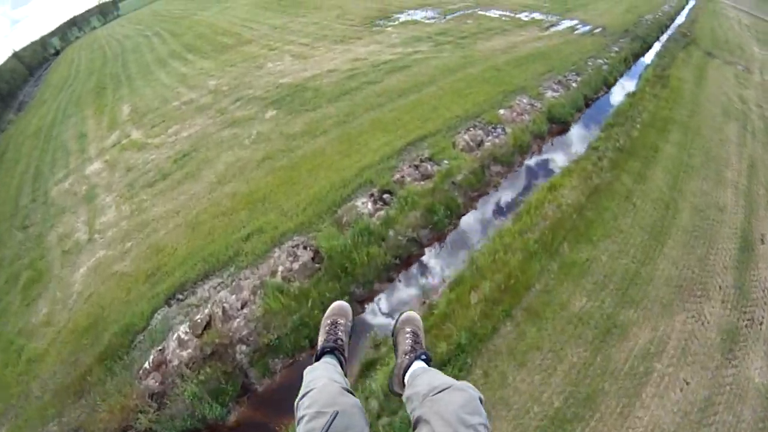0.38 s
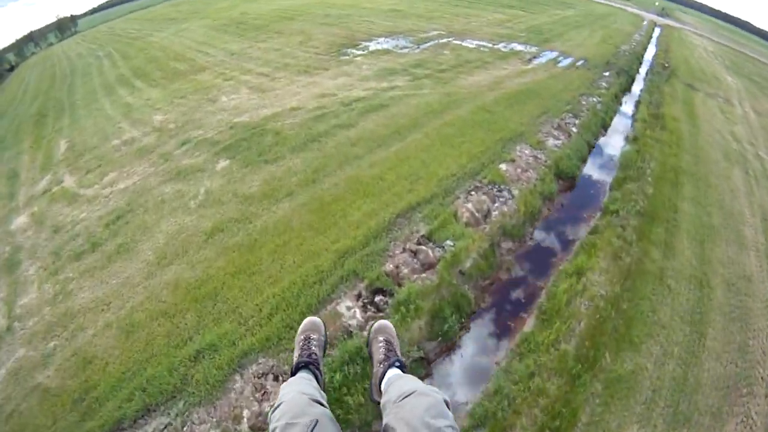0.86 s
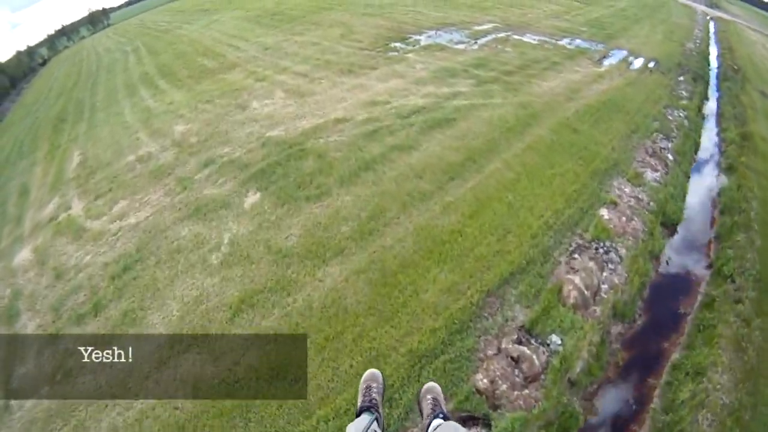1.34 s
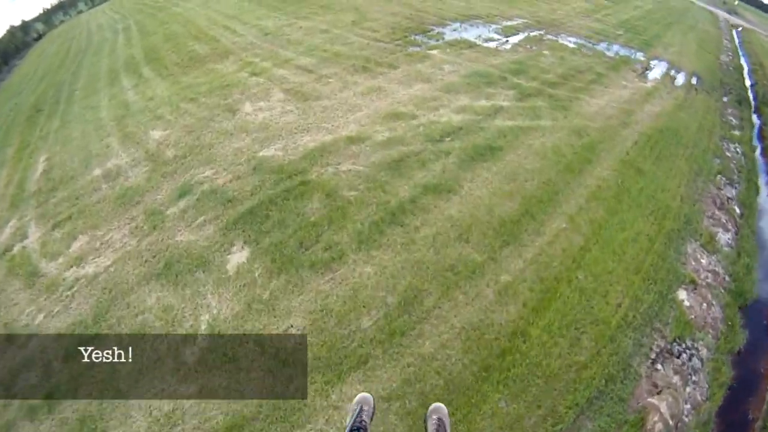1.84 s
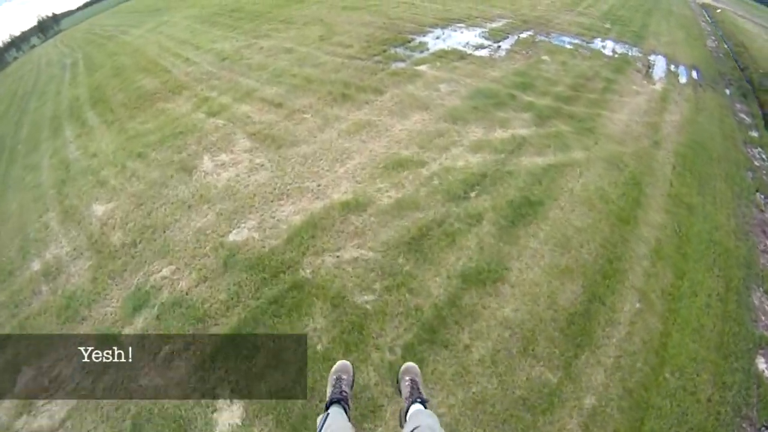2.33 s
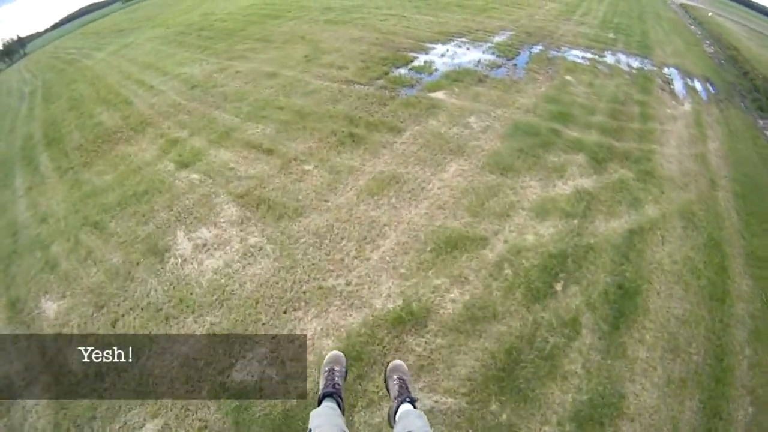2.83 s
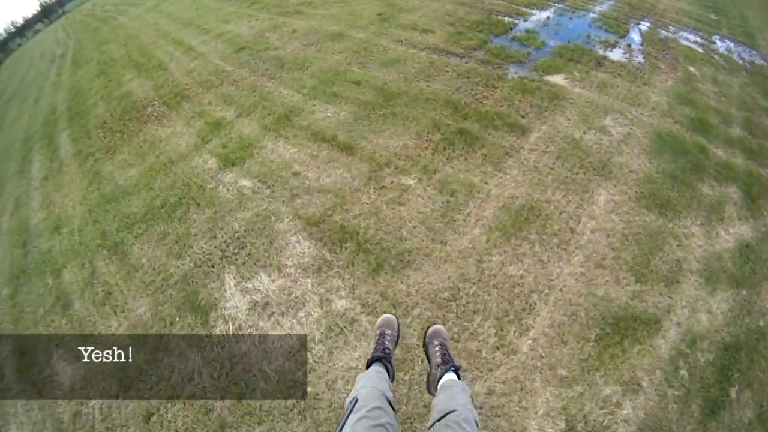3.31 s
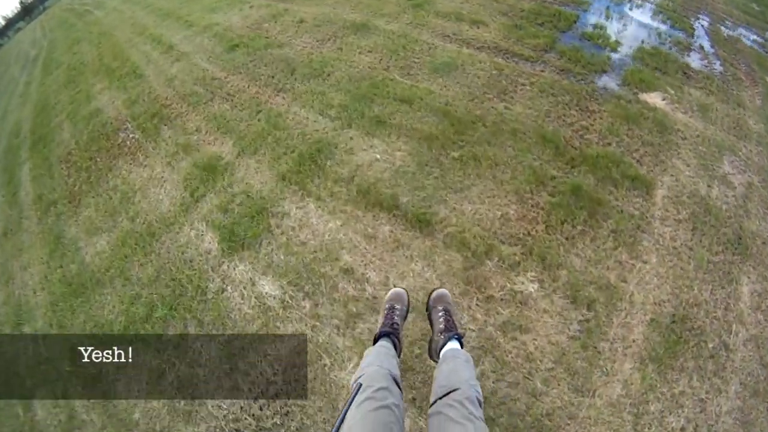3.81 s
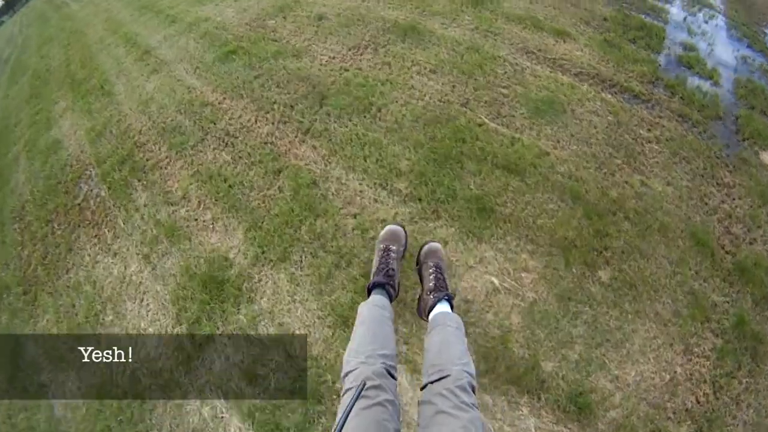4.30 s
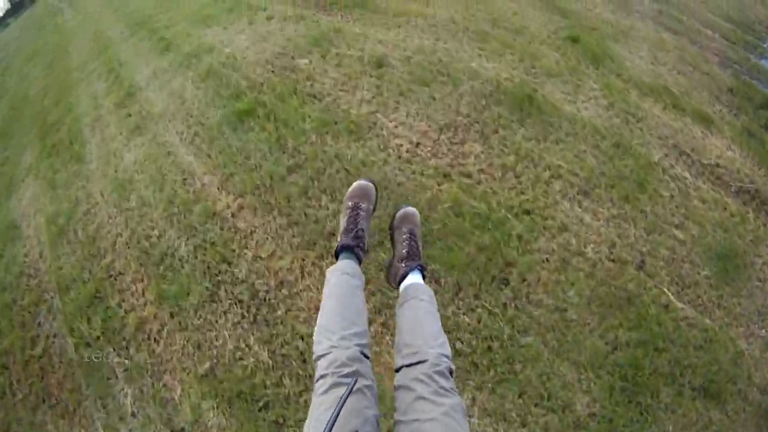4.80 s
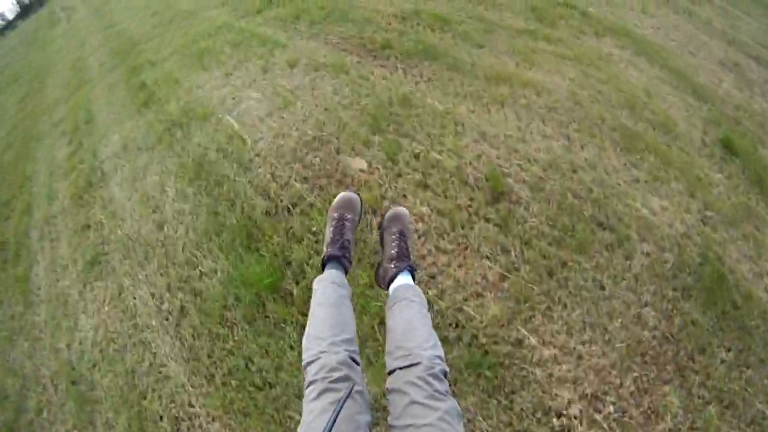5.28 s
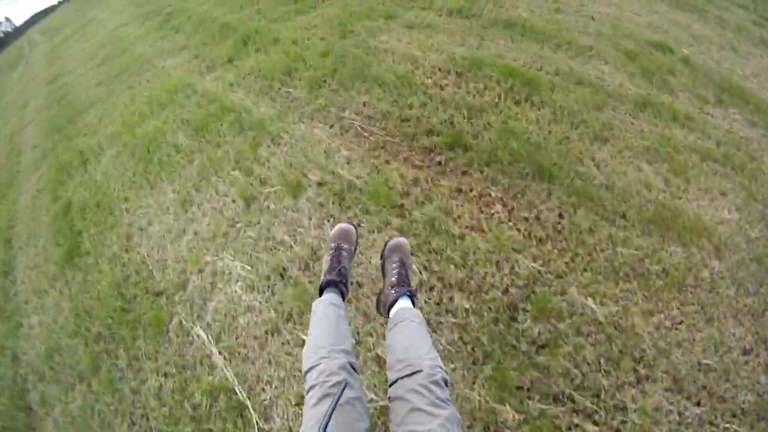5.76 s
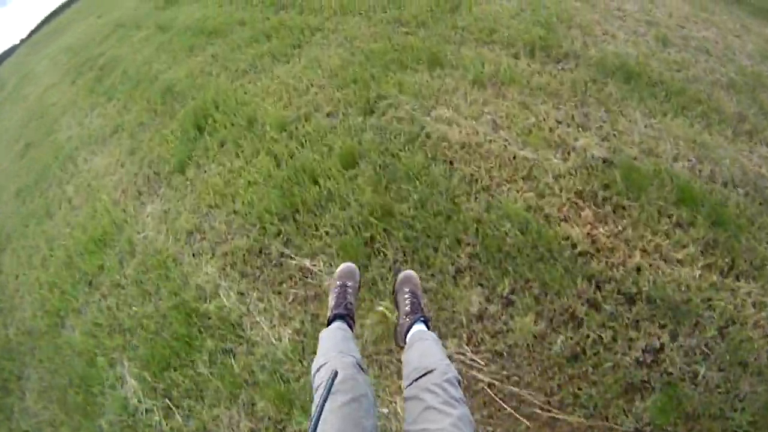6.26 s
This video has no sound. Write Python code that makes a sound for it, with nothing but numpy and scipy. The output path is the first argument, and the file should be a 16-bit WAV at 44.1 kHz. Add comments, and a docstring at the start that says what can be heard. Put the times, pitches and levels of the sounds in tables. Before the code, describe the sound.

Wind rushes straight onto a small microphone flying low over an open meadow. A deep, nearly constant rumble throbs under a muffled roar, while gusts bring rasp and hiss. Cloth flutters faintly. In the last second or so the wind drops as the flight slows, and quiet strap squeaks and soft fabric swishes show through. Coarse, low-quality sound with a thin sizzle on top.

```python
"""Wind on a low-flying camera

A small camera flies low over a meadow under a fabric wing, slowing down; wind tears across its microphone port.
Shaped noises form the wind: large eddies buffet the capsule, smaller ones roar in the housing and hiss at
the port's edge. Cloth rustles and swishes as flickering noise, and a strap squeaks in short gliding tones.
The recorder samples slowly and holds each value, which mirrors the roar as a thin sizzle high up."""
import sys
import numpy as np
from scipy import signal
from scipy.fft import rfft, irfft, next_fast_len
from scipy.io import wavfile
from scipy.ndimage import uniform_filter1d, minimum_filter1d, map_coordinates

SR = 44100
rng = np.random.default_rng(int(sys.argv[2]) if len(sys.argv) > 2 else 0)


def master(y):
    """Save y as 16-bit WAV."""
    cut = np.clip(np.atleast_2d(y).T, -1, 1)
    pcm = np.round(cut * 32767)  # scale
    wavfile.write(sys.argv[1], SR, pcm.astype(np.int16))


def ratio_of_db(decibels):
    """Turn decibels (scalar or array-like) into linear amplitude factors; 0 dB maps to 1."""
    return 10 ** (np.asarray(decibels, float) / 20)


N = 292383


def unit(x):
    """Scaled to rms 1."""
    return x / np.sqrt(np.mean(x ** 2))


def wobble(rate):
    """A smooth random curve, rate knots a second."""
    knots = rng.standard_normal(4000)
    return map_coordinates(knots, [np.arange(N) * rate / SR])


def curves(rows):
    """One value per sample for each column after the time."""
    seconds, *columns = np.transpose(rows)
    return [np.interp(np.arange(N) / SR, seconds, column) for column in columns]


def swells(rows, rise_s, fall_s):
    """For each dB column, the sum of swells that rise, hold and fall."""
    start, length, *columns = np.transpose(rows)
    since = np.arange(N) / SR - start[:, None]
    rise = since / rise_s
    fall = (length[:, None] - since) / fall_s
    return np.array(columns) @ np.clip(np.minimum(rise, fall), 0, 1)


def rush(spectrum, patchy_db, flutter_db):
    """Rms-1 coloured noise with random gain patches in time and pitch; flutter_db is a fast gain curve."""
    z = signal.stft(rng.standard_normal(N), nperseg=512)[2]
    field = uniform_filter1d(rng.standard_normal(z.shape), size=5, axis=0)
    field = uniform_filter1d(field, size=8, axis=1)
    noise = signal.istft(z * ratio_of_db(patchy_db * unit(field)), nperseg=512)[1][:N]
    fluttering = noise * ratio_of_db(flutter_db)
    # the spectrum is drawn as straight lines over log frequency
    m = next_fast_len(N + 8192)
    hz, db = np.transpose(spectrum)
    colour = ratio_of_db(np.interp(np.log(np.fft.rfftfreq(m, 1 / SR) + 1), np.log(hz + 1), db))
    return unit(irfft(rfft(fluttering, m) * colour, m)[:N])


def wind_level(full_db, per_flow, per_gust):
    """A layer's level in dB: full_db at full airflow, plus its own share of each dB of airflow and gust."""
    # Airflow over the housing. Each row: time in seconds, flow in dB before the layer's share.
    airflow = [(0.0, -24), (.2, -22), (.9, -22), (1.5, -21), (1.8, -24), (1.92, -22.5), (2.12, -25.5),
               (2.22, -23.5), (2.9, -21.5), (3.35, -23.5), (4.05, -24.5), (4.15, -26), (4.62, -29),
               (4.72, -26.5), (5.5, -27.5), (5.65, -27), (6.0, -31), (6.3, -34), (6.63, -38.5)]
    # Gusts across the port, and lulls where it turns out of the stream.
    # Each row: start in seconds, length in seconds, strength in dB before the layer's share.
    gust_rows = [(.03, 0.18, 2.5), (.78, 0.064, -9), (1.1, .27, 1), (1.37, 0.59, 4), (1.93, 0.16, 1),
                 (2.16, 0.054, 12), (2.24, .34, 0.7), (2.58, 0.28, -4.5), (2.81, 0.096, 1.5),
                 (3.5, 0.55, 1), (4.53, 0.083, 9.5), (4.66, 0.41, 7.5), (5.2, .36, -3), (5.56, 0.23, 3),
                 (5.78, 0.046, 4), (5.85, 0.058, 8), (5.98, .8, -6), (6.25, 0.37, -5.5)]
    full_flow_db = -21
    flow_db, = curves(airflow)
    gust_db, = swells(gust_rows, rise_s=0.048, fall_s=.04)
    return full_db + per_flow * (flow_db - full_flow_db) + per_gust * gust_db


def buffet(shove_db):
    """Large eddies push the capsule in a low rumble, evened out so that it hardly ever lets up."""
    # Each row: frequency in Hz, relative level in dB.
    spectrum = [(12, -120), (20, -6), (40, -2), (70, -4.5), (110, -6), (200, -28.5), (400, -71)]
    noise = rush(spectrum, patchy_db=0.0, flutter_db=0)
    swell = np.sqrt(np.abs(uniform_filter1d(noise ** 2, size=3000)) + .05)
    steady = unit(noise / swell ** 0.7)
    return ratio_of_db(wind_level(-22, 0.53, 0.038) + shove_db) * steady


def throb(pump_db, gusts):
    """Low noise just above the buffeting pulses with the gusts and a slow wobble of its own."""
    # Each row: frequency in Hz, relative level in dB.
    spectrum = [(40, -29), (80, -11.5), (130, -0.5), (220, -3.5), (320, -10), (600, -58)]
    noise = rush(spectrum, patchy_db=-0.33, flutter_db=1.12 * gusts + 0.55 * wobble(15))
    return ratio_of_db(wind_level(-21, 1.06, 0.077) + pump_db) * noise


def roar(gusts):
    """Smaller eddies roar in the housing, loudest at a few hundred Hz."""
    # Each row: frequency in Hz, relative level in dB.
    spectrum = [(100, -62), (200, -7.5), (300, -2.5), (450, -3), (600, -5), (750, -13.5), (950, -22),
                (1400, -66)]
    noise = rush(spectrum, patchy_db=0.7, flutter_db=0.68 * gusts + 0.54 * wobble(40))
    return ratio_of_db(wind_level(-20.5, 0.9, 0.13)) * noise


def rasp(gusts, ripples):
    """Rough noise around 1 kHz, the layer that gusts lift the most."""
    # Each row: frequency in Hz, relative level in dB.
    spectrum = [(400, -65), (800, -4.5), (1100, -1.5), (1500, -7), (2200, -13.5), (3200, -46)]
    flutter_db = 0.55 * gusts + 0.71 * ripples + 1.2 * wobble(60)
    return ratio_of_db(wind_level(-39.5, 0.72, 0.87)) * rush(spectrum, patchy_db=0.66, flutter_db=flutter_db)


def edge_hiss(gusts, ripples):
    """Fine eddies hiss at the port's edge with a fast flutter."""
    # Each row: frequency in Hz, relative level in dB.
    spectrum = [(700, -48), (1400, -5.5), (2300, -1.5), (2700, -3), (3000, -7), (3400, -13.5),
                (3850, -10.5), (4200, -23), (5500, -27.5), (6500, -29), (8000, -120)]
    flutter_db = 0.65 * gusts + 0.95 * ripples + 1.4 * wobble(70)
    return ratio_of_db(wind_level(-44, 0.82, 0.47)) * rush(spectrum, patchy_db=0.0, flutter_db=flutter_db)


def whistle():
    """The port's breathy resonance, a narrow band of noise, speaks up or falls quiet."""
    # Each row: frequency in Hz, relative level in dB.
    spectrum = [(2000, -60), (2450, -7), (2700, -3), (2950, -9), (3500, -60)]
    # Each row: start in seconds, length in seconds, change of level in dB.
    speaking = [(5.0, .5, -2.5), (0.447, 0.39, 7), (1.43, 0.33, 4), (2.2, .12, 2), (2.81, .1, 5)]
    speak_db, = swells(speaking, rise_s=0.048, fall_s=.04)
    noise = rush(spectrum, patchy_db=0.5, flutter_db=0.75 * wobble(30))
    return ratio_of_db(wind_level(-51.5, 0.82, 0.36) + speak_db) * noise


def wind():
    """Shared random curves make throb, roar, rasp and edge hiss flutter together; the whistle wavers alone."""
    # Big eddies shouldering the capsule.
    # Each row: start in seconds, length in seconds, change of buffet in dB, change of throb in dB.
    surges = [(.18, .15, 2, -2), (.45, 0.4, 5.5, 3.5), (.84, 0.33, 4.5, 3), (1.24, 0.067, -4, 3),
              (1.45, 0.066, 5, -6), (2.18, 0.25, -1.5, 2.5), (2.4, 0.27, 0.5, 4), (2.68, 0.15, 3.7, 2.5),
              (2.84, 0.1, 8.5, -5), (3.04, 0.13, -9, 1.5), (3.6, 0.13, 2, 2.5), (3.98, 0.17, 4, -3.4),
              (4.22, 0.1, -8, 0.5), (4.8, 0.17, 1, 2), (5.57, 0.1, 5.5, 3.5), (6.0, 0.15, 4.5, 0),
              (6.36, 0.12, 5.5, 6.5)]
    shove_db, pump_db = swells(surges, rise_s=0.038, fall_s=.05)
    gusts, ripples = wobble(25), wobble(110)
    large = buffet(shove_db) + throb(pump_db, gusts) + roar(gusts)
    return large + rasp(gusts, ripples) + edge_hiss(gusts, ripples) + whistle()


def strap():
    """Each squeak of the strap is a short gliding tone that wavers."""
    # Each row: start in seconds, peak level in dB, then start pitch in Hz and end pitch in Hz
    # before the waver, length in seconds.
    squeaks = [(5.606, -43, 3800, 3600, .008), (5.683, -44, 2750, 3200, .018),
               (5.794, -38, 3200, 3000, 0.011), (6.146, -42, 3900, 3300, 0.0055),
               (6.154, -39.5, 3200, 2800, 0.013), (6.243, -49, 4000, 3800, .008),
               (6.603, -41, 3680, 2600, 0.027)]
    out = np.zeros(N + SR)
    waver = 1 + .02 * np.pad(wobble(400), (0, SR))  # fast random share of pitch
    for start_s, db, start_hz, end_hz, length_s in squeaks:
        n, first = int(length_s * SR), round(start_s * SR)
        pitch_hz = np.linspace(start_hz, end_hz, n) * waver[first:][:n]
        phase = 2 * np.pi * np.cumsum(pitch_hz) / SR
        out[first:][:n] += ratio_of_db(db) * np.hanning(n) * np.sin(phase)
    return out[:N]


def cloth_rustle():
    """The wing's cloth flutters: a hiss whose very fast random gain gives it a fine crackle."""
    # Each row: frequency in Hz, relative level in dB.
    spectrum = [(1200, -26), (2400, -7), (3000, 5.5), (3500, 3), (3900, 6), (4300, -1), (5000, -13),
                (5600, -3.5), (6500, -4), (8000, -120)]
    # How hard the cloth flutters. Each row: time in seconds, rustle level in dB.
    flutter = [(0, -58), (.2, -54), (.35, -57.5), (1.7, -52.5), (2.0, -59), (2.8, -70), (2.9, -57.5),
               (4.6, -55.5), (5.0, -56.5), (5.3, -62.5), (5.9, -60), (6.15, -54), (6.4, -60.5),
               (6.63, -57.5)]
    rustle_db, = curves(flutter)
    return ratio_of_db(rustle_db) * rush(spectrum, patchy_db=1.6, flutter_db=0.62 * wobble(30) + 2.0 * wobble(300))


def cloth_swish():
    """Now and then the cloth slides: airy noise under a rounded stroke."""
    # Each row: frequency in Hz, relative level in dB.
    spectrum = [(2000, -30), (3000, 3), (4000, 1), (4700, -2), (5300, -10), (6500, 0), (8000, -120)]
    # Each row: start in seconds, length in seconds, level at the peak of the stroke in dB.
    slides = [(2.14, 0.16, -53), (4.22, .12, -60.5), (5.95, 0.37, -54.5), (6.3, 0.45, -61)]
    t = np.arange(N) / SR
    strokes = np.zeros(N)
    for start_s, length_s, db in slides:
        progress = np.clip((t - start_s) / length_s, 0, 1)
        strokes += ratio_of_db(db) * np.abs(np.sin(np.pi * progress)) ** 0.56
    return strokes * rush(spectrum, patchy_db=-1.0, flutter_db=1.1 * wobble(200))


def scene():
    """Wind, strap and cloth at one microphone."""
    return (wind() + strap() + cloth_rustle() + cloth_swish())[None]


def swing_lopsided(pressure):
    """The capsule swings further one way, by the square of the slow pressure."""
    low_pass = signal.butter(N=4, Wn=350, fs=SR, output="sos")
    heave = signal.sosfiltfilt(low_pass, pressure) ** 2
    return pressure + .3 * (heave - uniform_filter1d(heave, size=2000, axis=1))


def limit(x):
    """A limiter tames the largest blows, easing its gain down ahead of each peak and up after it."""
    needed = (1 + np.abs(x / .95) ** 4) ** -.25
    lowest = minimum_filter1d(needed, size=400, axis=1)
    return x * uniform_filter1d(lowest, size=400, axis=1)


def sample_and_hold(x):
    """12000 samples a second, each held until the next, which mirrors the sound above 6 kHz."""
    # a steep low-pass guards the slow sampling
    smooth = signal.sosfilt(signal.butter(N=12, Wn=5650, fs=SR, output="sos"), x)
    slow = signal.resample_poly(smooth, 40, 147, axis=1)
    held = np.repeat(slow, 4, axis=1)  # now 48000 a second
    return signal.resample_poly(held, 147, 160, axis=1)[:, :N]


def top_cut(x):
    """Nothing passes above the cut-off."""
    return signal.sosfilt(signal.butter(12, 15690, fs=SR, output="sos"), x)


def record(dry):
    """Capsule, limiter and slow sampling in turn, then the recorder's steep upper band limit."""
    held = sample_and_hold(limit(swing_lopsided(dry)))
    band_limit = signal.ellip(10, .3, 70, 15230, fs=SR, output="sos")
    mix = signal.sosfiltfilt(band_limit, held)
    return top_cut(mix)


dry = scene()
out = record(dry)
master(out)
```